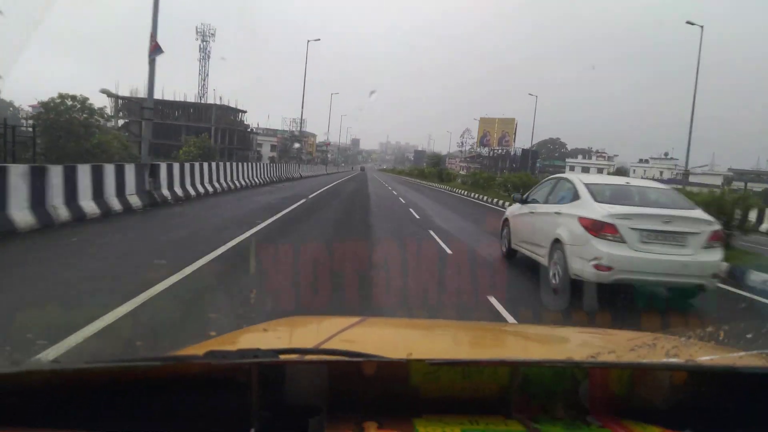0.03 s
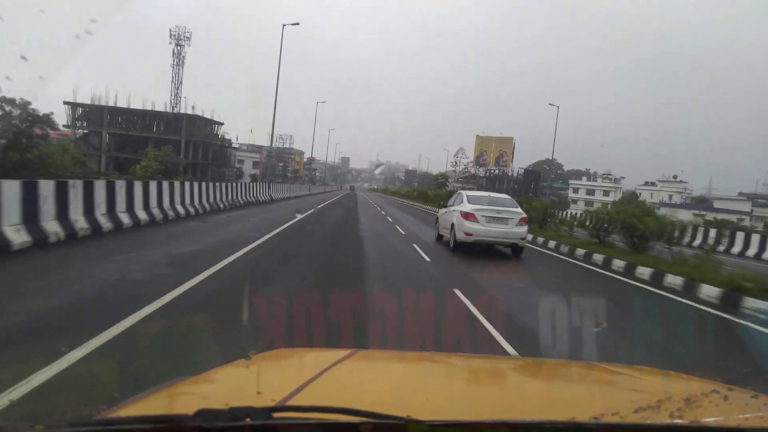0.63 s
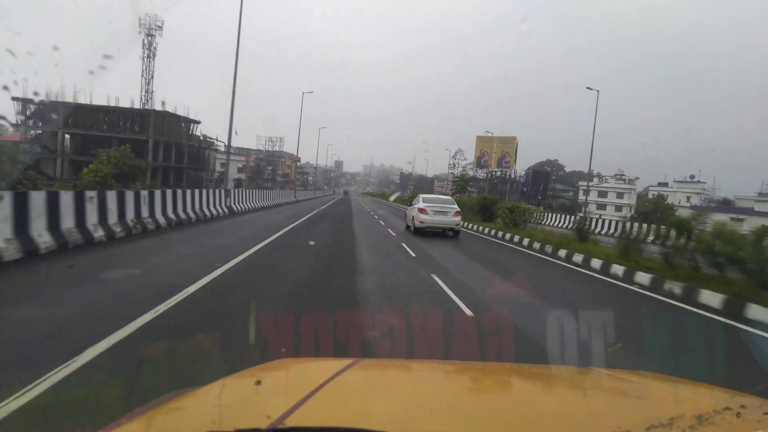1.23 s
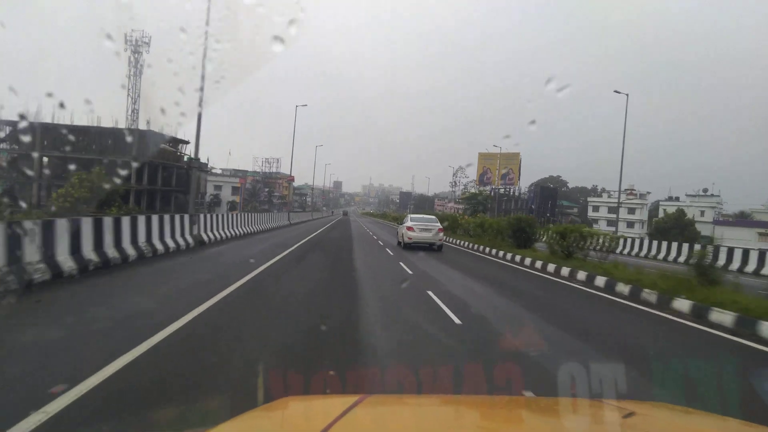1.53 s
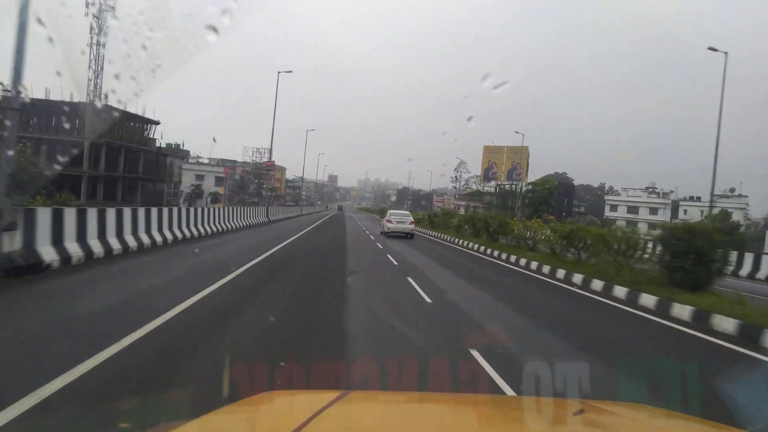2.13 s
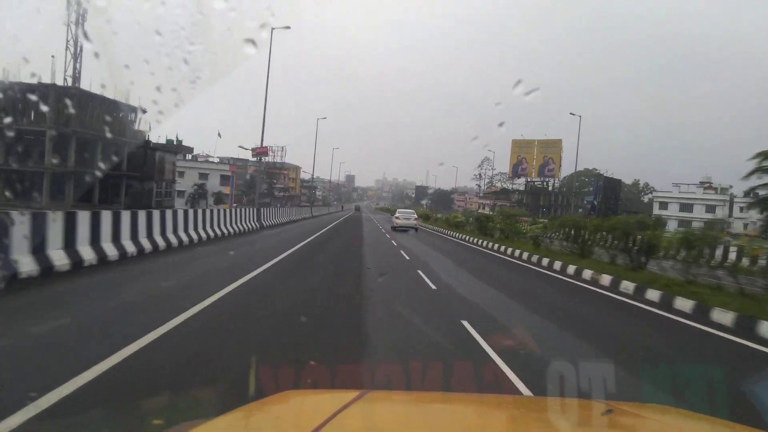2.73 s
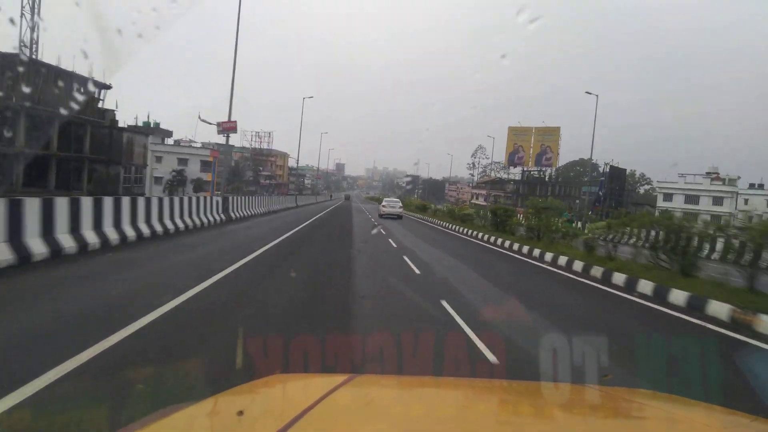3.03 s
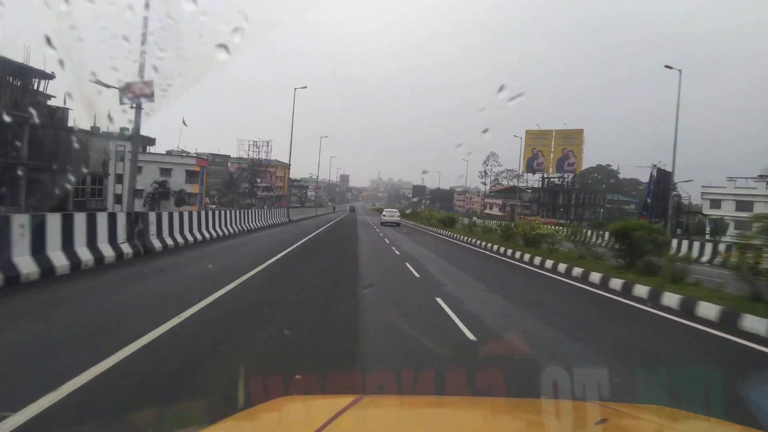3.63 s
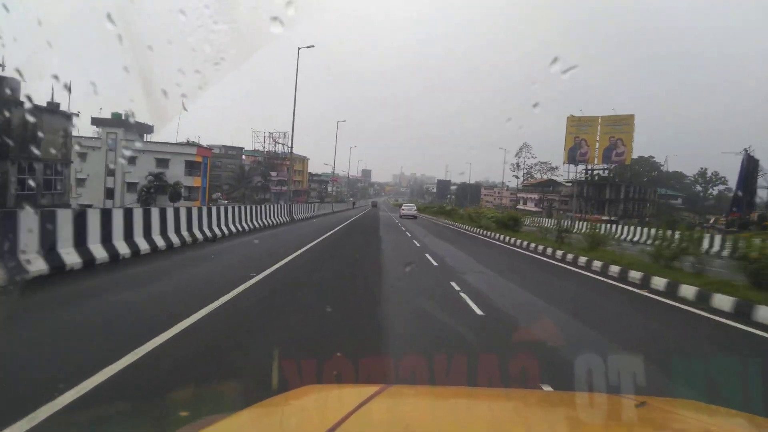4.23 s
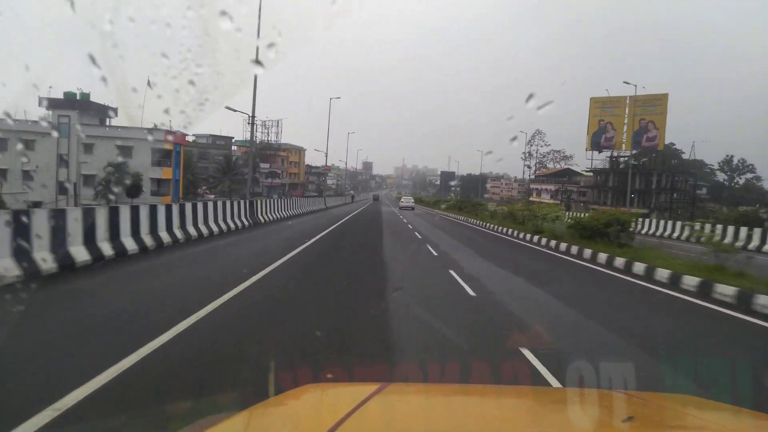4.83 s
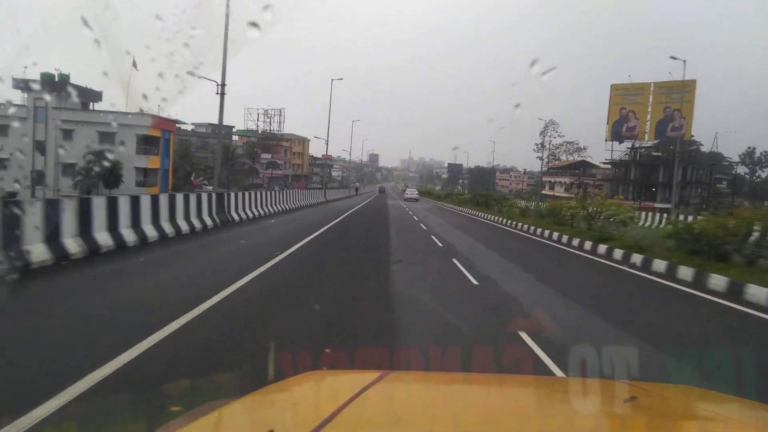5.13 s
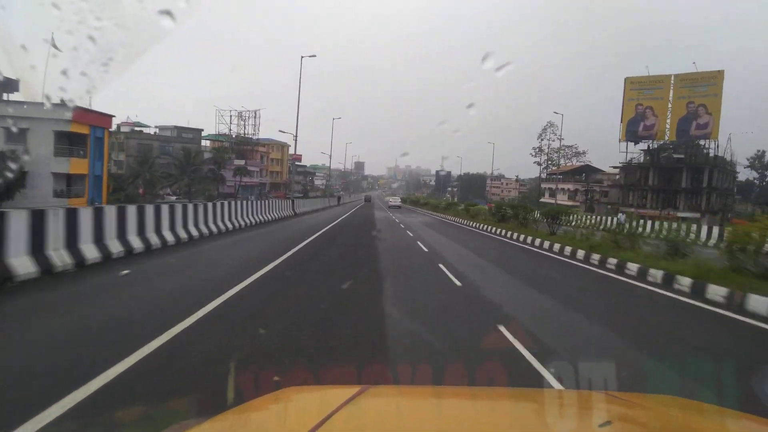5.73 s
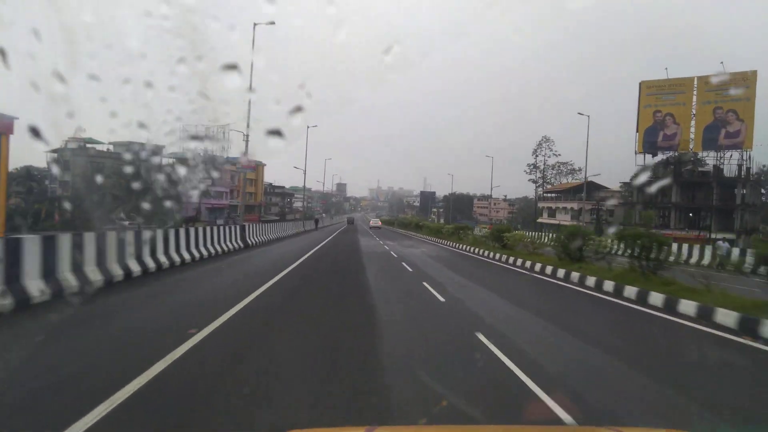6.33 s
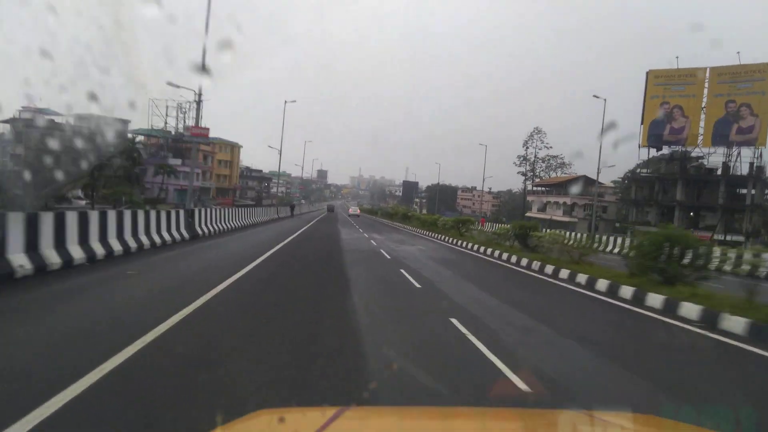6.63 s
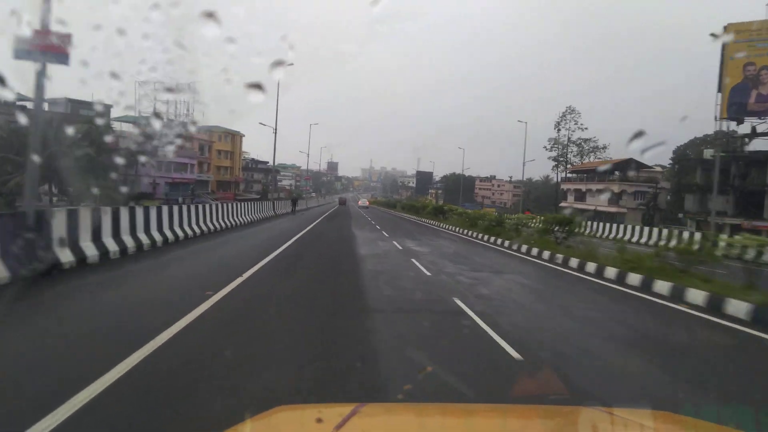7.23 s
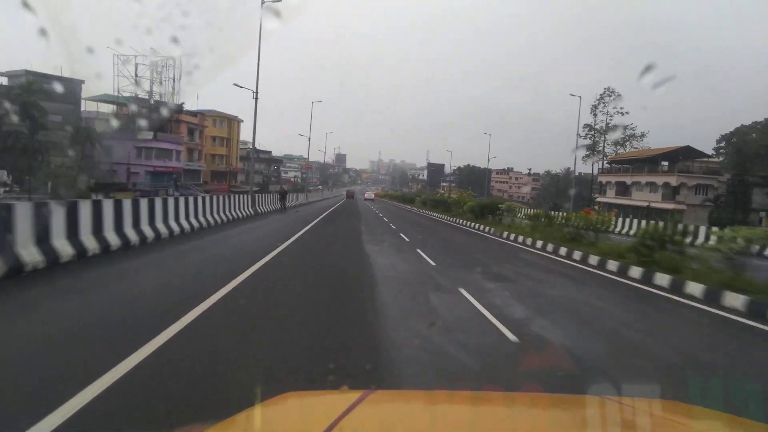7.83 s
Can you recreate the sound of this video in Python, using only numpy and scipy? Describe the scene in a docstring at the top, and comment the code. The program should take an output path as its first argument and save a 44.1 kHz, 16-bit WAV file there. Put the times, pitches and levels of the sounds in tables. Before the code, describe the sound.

Inside a vehicle on a wet highway, the engine booms and clatters, rising slightly in pitch as it gathers speed. Tyres rumble, air rushes and spray hisses underneath, with a faint ring from the dash and a thin whistle. A wiper swishes once near the start, and midway something ticks close on the left. Towards the end the spray grows louder and a hollow tyre roar swells and passes.

```python
"""Inside the cab of a four-cylinder vehicle that slowly gathers speed on a wet highway.
From the start the firing booms in the cabin's air modes and the engine clatters and whines behind the
dash, over tyre rumble, rushing air and spray; a part of the dash rings and a thin whistle hangs above.
At 0.5 s a wiper swishes once over the windscreen, and at 4.3 s something ticks close by on the left.
Towards the end the spray hisses more and more, and near 7 s a hollow tyre roar swells and passes."""
import sys
import numpy as np
from scipy import signal
from scipy.fft import rfft, irfft
from scipy.io import wavfile
from scipy.ndimage import uniform_filter1d, minimum_filter1d

SR = 44100
rng = np.random.default_rng(int(sys.argv[2]) if len(sys.argv) > 2 else 0)


def wrap_up_sound(samples):
    """Save the sound to the file named by the first command line argument, as 16-bit audio."""
    columns = np.atleast_2d(samples).T
    # keep every value between -1 and 1, then stretch to whole-number steps
    tamed = np.clip(columns, -1, 1)
    steps = np.round(tamed * 32767).astype(np.int16)
    wavfile.write(sys.argv[1], SR, steps)


N = 357210
TIME, HZ = np.arange(N) / SR, np.fft.rfftfreq(N, 1 / SR)

# engine speed: time_s, firing_hz
FIRING_RATE = [(0.0, 68.54), (0.7, 69.79), (2.3, 71.61), (3.8, 73.7), (5.6, 77.08), (6.4, 78.24),
               (7.6, 79.36), (8.1, 79.12)]
# loudness of the wet road, which rumble and rush each follow by their own law: time_s, level_db
ROAD_LEVEL = [(0.0, 1), (1.0, -0.4), (1.7, -3), (4.1, -2.5), (4.8, 0.2), (5.5, -0.5), (6.4, 3.5),
              (7.1, 2.5), (7.85, 3), (8.1, 7)]
# spray thrown up by the tyres: time_s, level_db
SPRAY_LEVEL = [(0, -5), (1.0, -6), (1.7, -10.5), (4.1, -9.5), (4.8, -5.5), (5.6, -8), (6.2, -5.5),
               (6.4, -1), (7.1, -1), (7.85, 5), (8.1, 1.5)]


def gain_of(db):
    """The decibel scale: 20 dB is a factor of ten in amplitude."""
    return 10 ** (np.asarray(db) / 20)


def over_time(rows):
    """Linear interpolation of a curve at every sample."""
    return np.interp(TIME, *np.transpose(rows))


def over_pitch(rows):
    """Interpolation of a spectrum on a logarithmic frequency axis."""
    hz, value = np.transpose(rows)
    return np.interp(np.log(HZ + 1), np.log(hz + 1), value)


def wander(rate_hz):
    """Random modulation: low-passed noise of unit variance."""
    slow = irfft(rfft(rng.standard_normal(N)) * np.exp(-(HZ / rate_hz) ** 2), N)
    return (slow - slow.mean()) / slow.std()


def resonance_db(resonances, hz):
    """Resonance: each peak or dip adds a Lorentzian curve to the level."""
    return sum(db / (1 + (2 * (hz - centre) / width) ** 2) for centre, width, db in resonances)


def in_cabin(pair, spectrum_db, right_lead_s=0.000469, direct_hz=1000):
    """Partial coherence: bass reaches both microphones alike, treble the right one first."""
    # likeness of the two microphones: frequency_hz, coherence_ratio
    likeness = [(130, 1), (220, .97), (290, .8), (480, .7), (600, .32), (1000, .22), (1500, .42),
                (2400, .42), (4000, .3), (14000, .28)]
    coherence = np.clip(over_pitch(likeness), 0, 1)
    left, unrelated = rfft(pair)
    lead = np.exp(2j * np.pi * HZ * right_lead_s * (HZ > direct_hz))
    right = (coherence * left + np.sqrt(1 - coherence ** 2) * unrelated) * lead
    return irfft(np.array([left, right]) * gain_of(spectrum_db) * np.sqrt(SR / 2), N)


def noise(spectrum_db):
    """Spectral shaping: white noise takes on a given density in the cabin."""
    return in_cabin(rng.standard_normal((2, N)), spectrum_db)


def narrow_noise(pitch_hz, width_hz, density_db):
    """Random excitation of one sharp resonance gives a breathy tone."""
    return noise(density_db - 20 * np.log10(1 + (2 * (HZ - pitch_hz) / width_hz) ** 2))


def tyre_rumble(bumps_db=1.5):
    """Structure-borne sound: the tyres rumble unevenly through the floor."""
    # rumble spectrum: frequency_hz, density_db
    spectrum = [(15, -83), (27, -75.5), (38, -60), (52, -51), (100, -52.5), (150, -52), (190, -57),
                (235, -58), (285, -63.5), (430, -63), (520, -65), (650, -72), (1200, -73), (3000, -105),
                (14400, -106), (15400, -135)]
    level_db = -0.34 + 0.55 * over_time(ROAD_LEVEL) + bumps_db * wander(26)
    return noise(over_pitch(spectrum)) * gain_of(level_db)


def air_rush(panels_db, panel_share=0.43, gusts_db=0.44):
    """Flow noise: air rushes past the panels and is coloured by their resonances."""
    # rush spectrum: frequency_hz, density_db
    spectrum = [(300, -96.5), (700, -72), (1050, -74), (1400, -71.5), (1750, -74.5), (2300, -75),
                (2700, -73), (3300, -79.5), (4500, -89.5), (6300, -93.5), (7500, -105), (9000, -118),
                (15500, -140)]
    road_db = over_time(ROAD_LEVEL)
    level_db = 1.1 + 0.89 * road_db - 0.081 * road_db ** 2 + gusts_db * wander(36)
    return noise(over_pitch(spectrum) + panel_share * panels_db) * gain_of(level_db)


def tyre_spray(splash_db=1.5):
    """Broadband noise: water thrown up by the tyres hisses with a flickering level."""
    # spray spectrum: frequency_hz, density_db
    spectrum = [(1500, -100), (3800, -87.5), (4600, -84.5), (5100, -85), (5500, -84.5), (6400, -92.5),
                (7400, -102), (8200, -103), (9200, -97), (10100, -93.5), (11600, -96), (13300, -101),
                (14000, -108), (15000, -116), (15600, -140)]
    return noise(over_pitch(spectrum)) * gain_of(over_time(SPRAY_LEVEL) + splash_db * wander(40))


def high_sizzle(exponent=1.5):
    """Power-law growth: a narrow sizzle near 7.2 kHz swells faster than the hiss."""
    sizzle = narrow_noise(pitch_hz=7180, width_hz=560, density_db=-90)
    return sizzle * gain_of(exponent * over_time(SPRAY_LEVEL))


def tyre_roar(peak_s=6.95, width_s=0.45, gusts_db=2.5):
    """Amplitude modulation: hollow tyre noise swells and passes under a Gaussian envelope."""
    # roar spectrum: frequency_hz, density_db
    spectrum = [(350, -91), (560, -73.5), (700, -66), (870, -65.5), (1050, -79), (1450, -71), (2400, -76),
                (3500, -102)]
    swell = np.exp(-.5 * ((TIME - peak_s) / width_s) ** 2)
    return noise(over_pitch(spectrum)) * swell * gain_of(gusts_db * wander(20))


def dash_ring():
    """Resonance: a small part of the dash rings on one note, swelling and fading."""
    # strength of the ring: time_s, level_db
    levels = [(0, -2), (1.1, 1), (1.5, -10), (2.4, -8), (2.8, -5), (4.3, -10), (4.7, 3.5), (5.3, -2),
              (8.1, -5)]
    return narrow_noise(pitch_hz=2170, width_hz=60, density_db=-72.5) * gain_of(over_time(levels))


def gap_whistle(flutter_db=1.5):
    """Flow-excited resonance: air sings through a small gap with a thin, fluttering tone."""
    # strength of the whistle: time_s, level_db
    levels = [(0, 2.5), (1.05, 3), (1.3, 0), (1.85, -3), (2.25, 0), (2.65, -1), (3.5, 1.5), (3.7, -7),
              (3.95, 1), (5.1, 3), (5.4, 0), (5.8, 0), (6.6, -2), (8.1, -5)]
    tone = narrow_noise(pitch_hz=5341, width_hz=50, density_db=-77.5)
    return tone * gain_of(over_time(levels) + flutter_db * wander(11))


def wiper(start_s=0.465, end_s=0.56, rise_db_per_s=426, fall_db_per_s=417, sag_db=3, judder_db=2.5,
          squeak_hz=10150, droop_hz=750, scatter_hz=250):
    """Friction: rubber on wet glass swishes and squeaks, loudest and highest as it grips and lets go."""
    # swish spectrum: frequency_hz, density_db
    spectrum = [(2500, -101), (4000, -78.5), (7000, -88), (8300, -104), (9200, -87), (10100, -73),
                (10800, -87), (11300, -83), (12500, -102), (15000, -106)]
    fade_db = rise_db_per_s * np.maximum(start_s - TIME, 0) + fall_db_per_s * np.maximum(TIME - end_s, 0)
    sag = np.sin(np.pi * np.clip((TIME - start_s) / (end_s - start_s), 0, 1))
    pitch_hz = squeak_hz - droop_hz * sag + scatter_hz * np.array([wander(500), wander(500)])
    swish = gain_of(-3.5) * noise(over_pitch(spectrum))
    squeak = gain_of(-46) * np.cos(2 * np.pi * np.cumsum(pitch_hz, axis=1) / SR)
    return (swish + squeak) * gain_of(judder_db * wander(120) - fade_db - sag_db * sag)


def tick(right_snap_db=-22, right_body_db=-5):
    """Impact excites damped modes by the left microphone; mainly the lowest reaches the right one."""
    # a tiny hard contact and its rebound: start_s, level_db
    contacts = [(4.3151, -9.5), (4.31547, -16)]
    # the body mode, then two of the bright snap: pitch_hz, life_s, level_db
    modes = [(3850, .00035, -13.5), (10200, .00022, -11), (12200, .00009, -.5)]
    out = np.zeros((2, N))
    for start_s, contact_db in contacts:
        t = np.maximum(TIME - start_s, 0)
        for k, (hz, life_s, mode_db) in enumerate(modes):
            sides = gain_of([[0], [right_snap_db if k else right_body_db]])
            envelope = 2 * t / life_s * np.exp(1 - 2 * t / life_s)
            out += sides * gain_of(contact_db + mode_db) * envelope * np.sin(2 * np.pi * hz * t)
    return out


def engine_whine(turns, panels_db, panel_share=2, drift_turns=0.071):
    """Forced vibration: high orders climb with the engine and sing out as they cross panel resonances."""
    # high engine orders: firing_multiple, level_db
    orders = [(4.25, -57.5), (4.5, -53), (4.75, -55), (5.75, -55), (6.25, -56), (6.75, -59), (7, -61),
              (7.25, -58), (7.75, -60), (9, -58.5), (10, -58), (11, -60), (12, -58), (13, -57),
              (13.75, -59.5), (15, -61.3), (15.75, -64), (16, -59.5), (16.25, -65), (17, -60.7),
              (17.75, -64.5), (18, -58.9), (18.5, -65), (18.75, -65), (19, -65.5), (19.5, -64.5), (20, -64),
              (21, -65), (24, -64), (24.25, -65), (25, -63), (25.25, -65), (28, -70), (29, -69.5),
              (30, -72), (31, -70.5), (32, -71)]
    # phase lead of the left microphone as the panels radiate: frequency_hz, lead_turns
    left_lead = [(950, 0), (1150, -.15), (1205, -.3), (1255, 0), (1310, .1), (1400, .43), (1600, .45),
                 (1950, .3), (2170, 0)]
    out, firing_hz, lead = np.zeros((2, N)), over_time(FIRING_RATE), over_pitch(left_lead)
    for multiple, db in orders:
        hz = multiple * firing_hz
        level = gain_of(db + panel_share * np.array([np.interp(hz, HZ, side) for side in panels_db]))
        # the path to the two microphones shifts
        apart = np.interp(hz, HZ, lead) / 2 + drift_turns * wander(1.3)
        out += level * np.cos(2 * np.pi * (multiple * turns + np.array([apart, -apart])))
    return np.sqrt(2) * out


def engine_clatter(turns, panels_db, panel_share=0.38, ring_s=0.019, unevenness=0.28, cylinders=4):
    """Impulse response: each cylinder knocks with its own ring, so the pattern spans four firings."""
    # clatter spectrum: frequency_hz, density_db
    spectrum = [(30, -92.5), (55, -72.5), (170, -59), (260, -71.5), (480, -70.5), (650, -71.5), (1000, -77),
                (1300, -77.5), (1700, -78.5), (2400, -76.5), (3300, -90.5), (6000, -98.5), (8000, -112),
                (14000, -118), (15500, -140)]
    firings = np.flatnonzero(np.diff(np.floor(turns)))
    force = 1 + unevenness * rng.standard_normal(len(firings))
    t = TIME[:SR // 10]
    knocks = np.zeros((2, N))
    for cylinder in range(cylinders):
        blows = np.zeros(N)
        blows[firings[cylinder::cylinders]] = force[cylinder::cylinders]
        ring = rng.standard_normal((2, len(t))) * np.exp(-t / ring_s)
        knocks += signal.oaconvolve(blows[None], ring, axes=1)[:, :N]
    return in_cabin(knocks / knocks.std(), over_pitch(spectrum) + panel_share * panels_db)


def engine_boom(turns, waver_db=0.5, firing_waver_db=-0.31, drift_turns=0.13,
                in_step_hz=72.73, slide_turns_per_hz=0.026):
    """Standing waves: low orders of the firing swell and fade as they slide over the cabin's air modes."""
    # low orders of engine and drivetrain: firing_multiple, level_db
    orders = [(.5, -62.5), (.83, -43.5), (1, -15.82), (1.08, -47), (1.5, -46.5), (2, -27.1), (2.25, -44.5),
              (2.5, -44), (2.75, -50), (3, -37.4), (4, -57.5)]
    # peaks and dead spots of the cabin's air at the seat: centre_hz, width_hz, lift_db
    air_modes = [(39.9, 2.6, 29), (119, 5, 8), (147.6, 4, 3.5), (151.3, 2.6, -3), (158.6, .7, 2.8),
                 (171, 5, 5), (217, 16, 6.5), (231, 11, -21), (313.5, 15, 16)]
    out, firing_hz = np.zeros(N), over_time(FIRING_RATE)
    # whole orders fall in step at one firing rate and slide apart on either side of it
    slide = slide_turns_per_hz * (firing_hz - in_step_hz)
    for multiple, db in orders:
        depth_db = firing_waver_db if multiple == 1 else waver_db
        level = gain_of(db + resonance_db(air_modes, multiple * firing_hz) + depth_db * wander(12))
        # fractional orders come from uneven cylinders and turning shafts, so they drift against the beat
        drift = drift_turns * wander(2.5) if multiple % 1 else (multiple - 1) * slide
        out += level * np.cos(2 * np.pi * (multiple * turns + drift))
    return np.sqrt(2) * out


def scene():
    """Superposition: engine, road and windscreen reach two microphones facing different parts of the cab."""
    # panel resonances, scaled by each source's panel_share: centre_hz, width_hz, left_db, right_db
    panels = [(520, 60, 3.3, 2.7), (755, 50, 2.3, 2.3), (810, 50, -2, -5), (990, 70, -2.5, -2),
              (1095, 25, 2.5, 0), (1155, 35, 4, 4), (1205, 30, 3.7, 5), (1245, 30, 3, 2.5),
              (1280, 34, 5.5, 2.5), (1318, 20, -3, -2), (1358, 25, 3, 2), (1412, 30, 1, 3),
              (1462, 35, 3.5, 2), (1560, 70, 2.5, 3.5), (1700, 50, 4, 0), (2070, 50, 3.5, 1),
              (2172, 42, 7.5, 7), (2278, 44, 7, 3), (2420, 90, 0, 3), (2630, 90, 3.5, 3), (3180, 150, 4, 0)]
    # level difference between the microphones: frequency_hz, left_minus_right_db
    balance = [(60, -1.67), (150, -1.84), (200, -4), (300, -1), (700, -0.5), (1000, 1.5), (1200, -0.7),
               (1450, -0.5), (1750, 6), (2400, 8), (3200, 5), (4200, 4.5), (14000, -0.5)]
    stereo_panels = [(hz, width, np.array([[left], [right]])) for hz, width, left, right in panels]
    panels_db = resonance_db(stereo_panels, HZ)
    turns = np.cumsum(over_time(FIRING_RATE)) / SR + .5  # one turn of phase per firing
    throb = 1 + 0.026 * np.cos(2 * np.pi * turns)
    engine = engine_boom(turns) + engine_clatter(turns, panels_db) + engine_whine(turns, panels_db)
    road = tyre_rumble() + (air_rush(panels_db) + tyre_spray()) * throb + tyre_roar()
    cab = engine + road + high_sizzle() + dash_ring() + gap_whistle() + wiper()
    sides = gain_of(np.outer([.5, -.5], over_pitch(balance)))
    return irfft(rfft(cab) * sides, N) + tick()


def limiter(x, threshold_db=-8.5, share=0.55, window_samples=900):
    """Dynamic compression: a quick drop in gain evens out the tallest firing peaks."""
    needed_gain = np.minimum(gain_of(threshold_db) / (abs(x).max(0) + 1e-9), 1)
    held_gain = minimum_filter1d(needed_gain, window_samples)
    return x * uniform_filter1d(held_gain, window_samples) ** share


def record(dry, notch_hz=8090, notch_width_hz=370, notch_db=-7.5, edge_hz=16500):
    """Antiresonance of the microphone port cuts a notch; a limiter and a band limit follow."""
    port_db = resonance_db([(notch_hz, notch_width_hz, notch_db)], HZ)
    coloured = irfft(rfft(dry) * gain_of(port_db), N)
    low_pass = signal.firwin(511, edge_hz, window=("kaiser", 9), fs=SR)
    return signal.oaconvolve(limiter(coloured), low_pass[None], "same")


dry = scene()
out = record(dry)
wrap_up_sound(out)
```